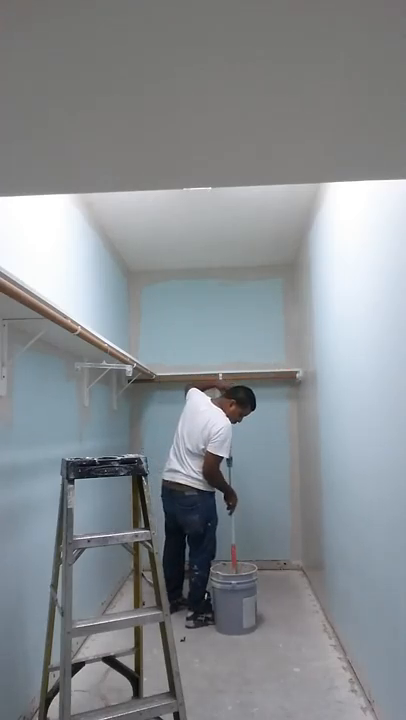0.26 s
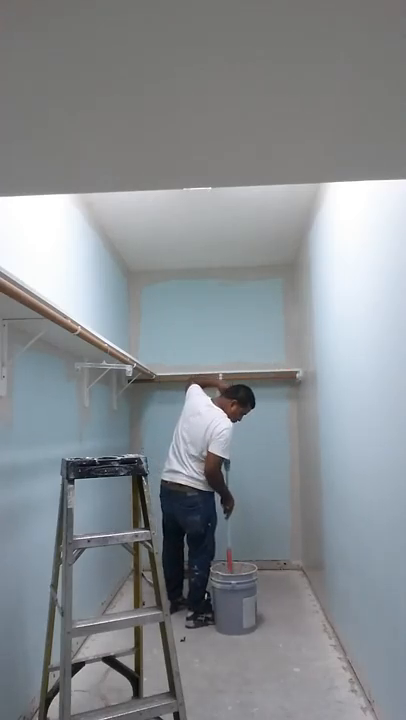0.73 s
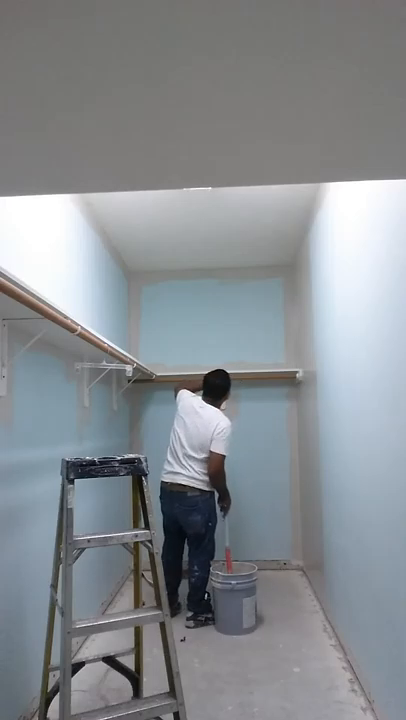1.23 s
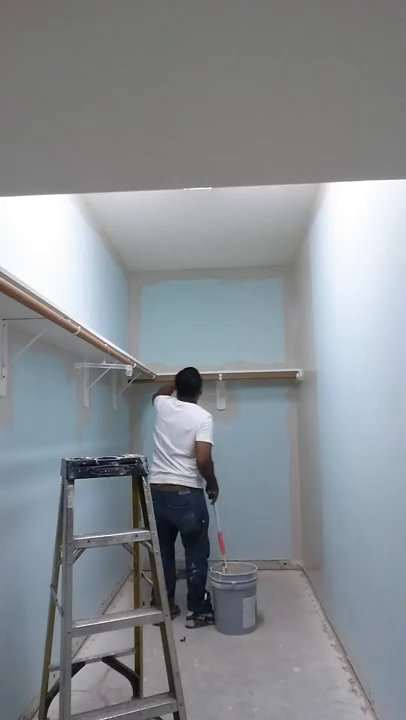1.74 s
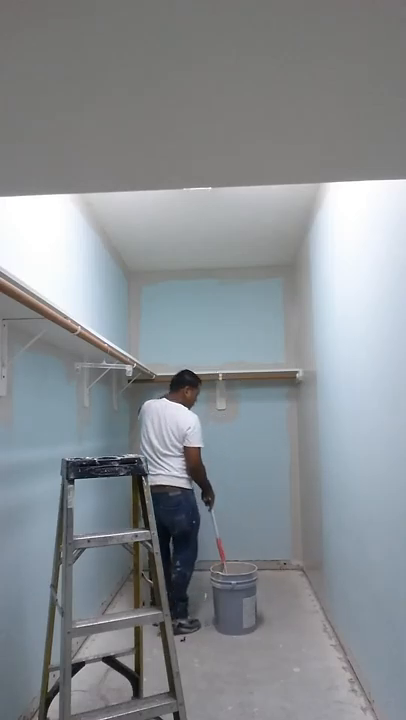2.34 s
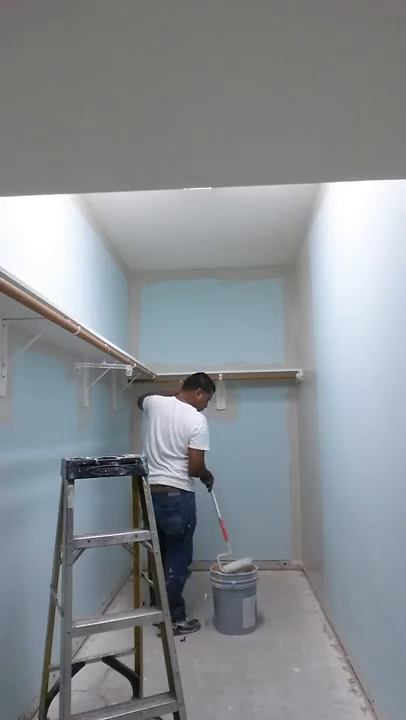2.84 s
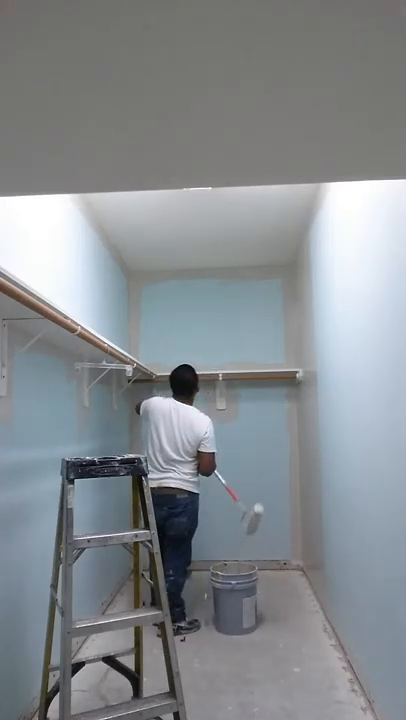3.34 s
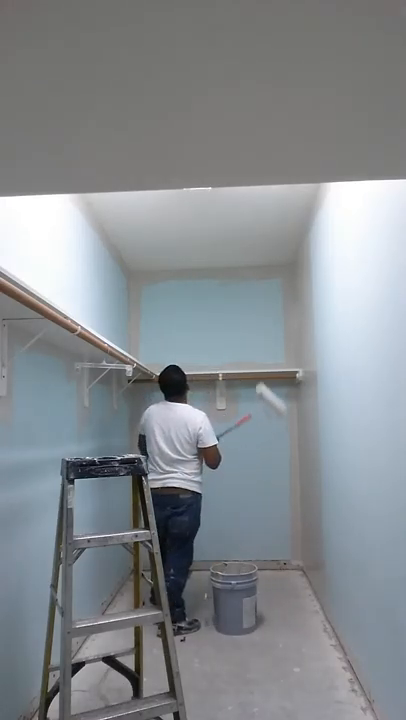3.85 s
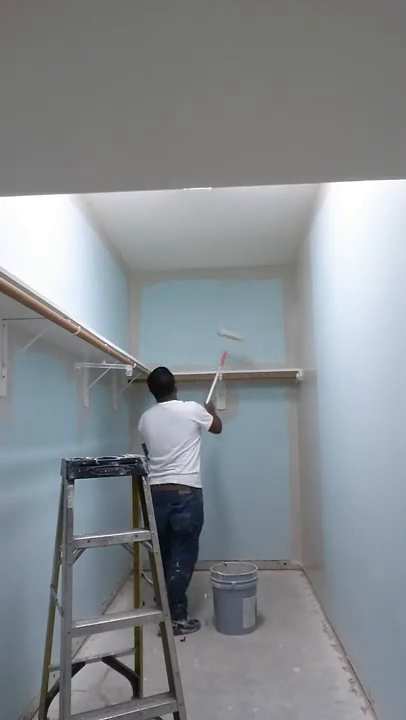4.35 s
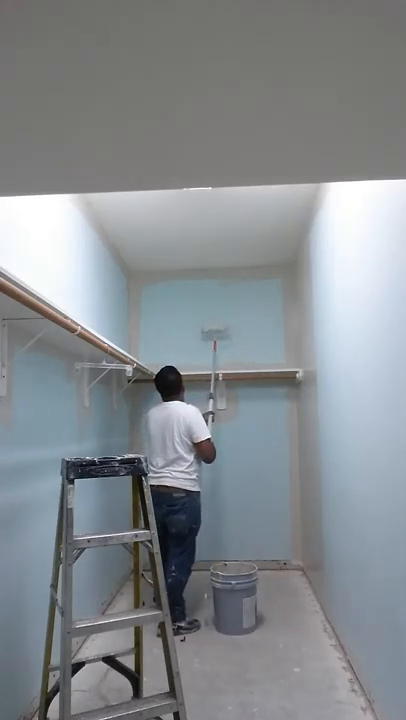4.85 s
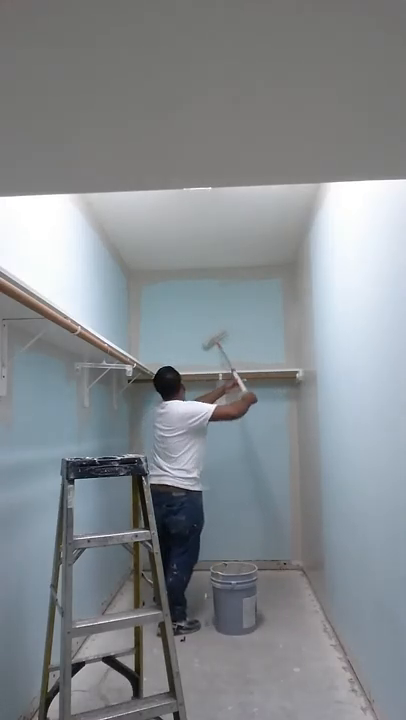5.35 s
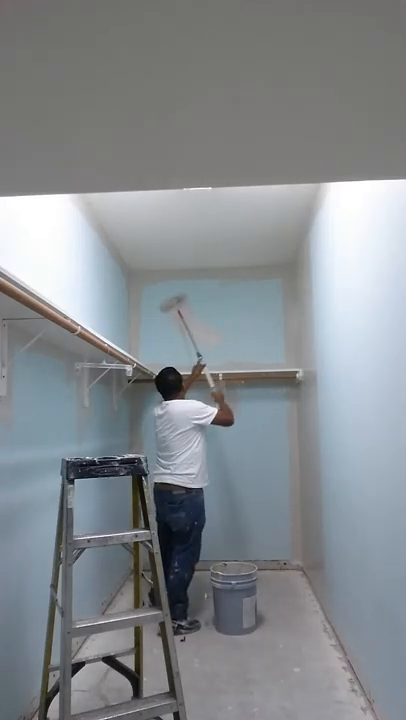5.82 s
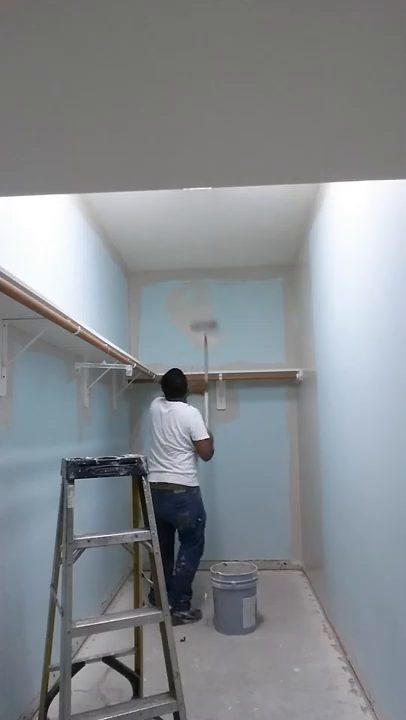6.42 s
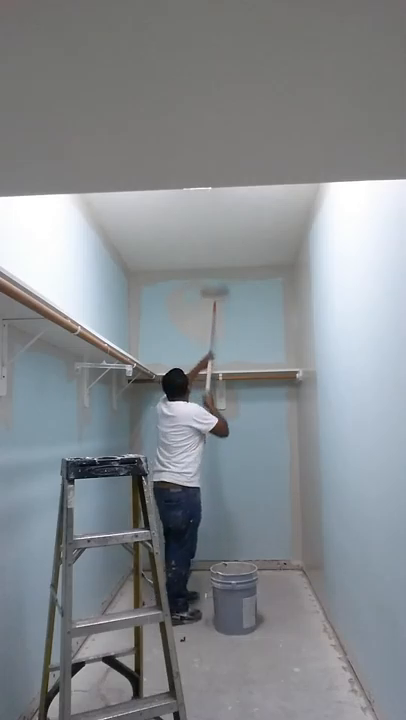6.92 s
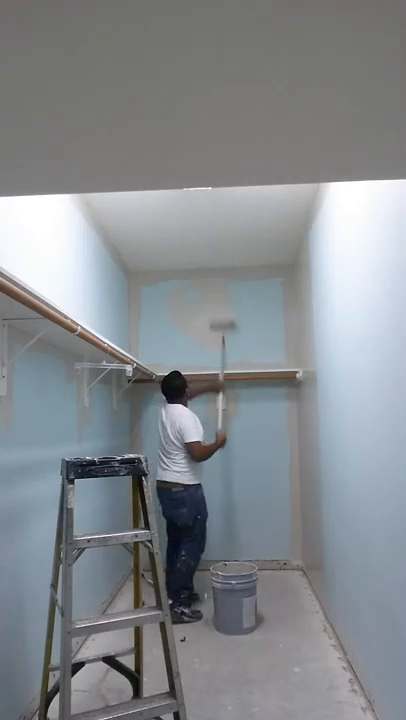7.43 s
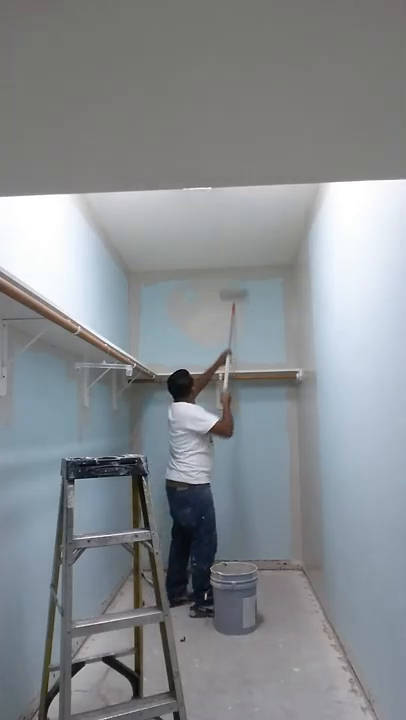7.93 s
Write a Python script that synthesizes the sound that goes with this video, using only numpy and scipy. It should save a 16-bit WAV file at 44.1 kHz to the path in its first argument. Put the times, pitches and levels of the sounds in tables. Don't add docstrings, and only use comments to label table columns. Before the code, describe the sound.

In a small, bare, very reverberant room, a wet paint roller drags and knocks in a plastic bucket, hollow and boomy, loudest around two seconds. A bright wet splat lifts it out near three seconds, followed by a last bump. From four seconds it rolls over a wall in soft sticky strokes, with one sharp ringing clack late on. Stereo microphones in the room, faint hiss.

```python
import sys
import numpy as np
from scipy import signal
from scipy.fft import rfft, irfft
from scipy.io import wavfile
from scipy.ndimage import uniform_filter1d

SR = 44100
rng = np.random.default_rng(int(sys.argv[2]) if len(sys.argv) > 2 else 0)


def wrap_up_sound(samples):
    columns = np.atleast_2d(samples).T
    tamed = np.clip(columns, -1, 1)
    steps = np.round(tamed * 32767).astype(np.int16)
    wavfile.write(sys.argv[1], SR, steps)


def how_loud(loudness_db):
    steps = np.asarray(loudness_db, float) / 20
    return 10 ** steps


N = 360738
EDGES = 250 * 2 ** np.arange(0, 6.2, 1 / 3)
CENTRES = np.sqrt(EDGES[1:] * EDGES[:-1])
TAIL = np.arange(int(1.4 * SR)) / SR
LEFT_RIGHT = np.array([[1], [-1]])
BLOW_BOOST_DB = 32
TOUCH_CYCLES = 1.13

# frequency in Hz, level in dB, T60 in seconds.
ROOM_BOOM = [(118, 1.5, 0.39), (144.2, -1, 0.38), (164.7, 4, 0.25), (191, 0.5, 0.46), (205, 2, 0.36),
             (238.9, -1, 0.46), (290, -6.5, 0.48), (353.3, -16, 0.16), (373.3, -9.5, 0.53),
             (412.7, -7.5, 0.51)]
# frequency in Hz, level in dB, T60 in seconds.
DEEP_THUMP = [(64, -14, 0.23), (75, 8.5, 0.55), (91, -7.5, 0.21)]
# frequency in Hz, level in dB per Hz.
TACK_COLOUR = [(1120, -10), (1900, -2), (2230, -2), (2520, 4.5), (3090, -2), (4950, 1.5), (5360, 4),
               (8270, -11), (13500, -13), (15100, -28), (15800, -29)]
# frequency in Hz, level in dB per Hz.
DRAG_COLOUR = [(190, -12.5), (330, -5), (504, -2), (615, -8.5), (720, -2.5), (1190, -5), (1550, -4),
               (2400, -9), (3120, -21.5), (5280, -120)]
# frequency in Hz, left-right likeness from -1 to 1.
PORT_LIKENESS = [(130, 0.63), (400, 0.996), (640, 0.93), (1000, 0.11), (1600, 0.018), (15000, -0.058)]


def unit(x, power=np.mean):
    return x / np.sqrt(np.mean(power(x ** 2, axis=-1)) + 1e-20)


def at_hz(points, hz):
    table = np.array(points)
    return np.interp(np.log(hz), np.log(table[:, 0]), table[:, 1])


def two_ports(mid, side, alike):
    return np.sqrt(1 + alike) * mid + np.sqrt(1 - alike) * side * LEFT_RIGHT


def both_ports(ring):
    return unit(ring * how_loud(-3 / 2 * LEFT_RIGHT), np.sum)


def heard(x, response):
    return signal.fftconvolve(x[None], response, axes=1)[:, :N]


def place():
    # frequency in Hz, T60 in seconds.
    room_t60 = [(100, 1), (400, 0.73), (1100, 0.95), (3000, 0.72), (8000, 0.71), (15000, 0.39)]
    # frequency in Hz, left minus right in dB.
    port_balance = [(60, -3.0), (110, -0.5), (200, -5), (380, -2), (700, -5), (1290, -10), (2380, -1.5),
                    (4400, 2.5), (8120, 0), (15000, -16.5)]
    direct_db, echo_rise_s, right_lag = -11.5, 0.0033, 18
    white = rng.standard_normal((2, 2, len(TAIL)))
    pieces = []
    for k, hz in enumerate(CENTRES):
        alike = np.clip(at_hz(PORT_LIKENESS, hz), -1, 1)
        mid, side = white[k % 2]
        decay = how_loud(-60 * TAIL / at_hz(room_t60, hz)) * (1 - np.exp(-TAIL / echo_rise_s))
        echoes = unit(two_ports(mid, side, alike) * decay, np.sum)
        echoes[[0, 1], [0, right_lag]] += how_loud(direct_db)
        band = signal.butter(2, EDGES[k:k + 2], "band", fs=SR, output="sos")
        pieces.append(signal.sosfilt(band, echoes) * how_loud(at_hz(port_balance, hz) / 2 * LEFT_RIGHT))
    return np.array(pieces)


def coloured(pieces, spectrum):
    return unit(np.tensordot(how_loud(at_hz(spectrum, CENTRES)), pieces, 1), np.sum)


def moving(x, spots, spectrum, dwell=2600):
    where = np.repeat(rng.integers(0, len(spots), N // 1000), dwell)[:N]
    return sum(heard(x * (where == k), coloured(spot, spectrum)) for k, spot in enumerate(spots))


def modes(table, swell_s=0.0037):
    hz, db, t60 = np.transpose(table)[:, :, None]
    swell = 1 - np.exp(-TAIL / swell_s)
    return how_loud(db - 60 * TAIL / t60) * np.sin(2 * np.pi * hz * TAIL) * swell


def pumped_modes(boom, thump):
    return (heard(boom, both_ports(modes(ROOM_BOOM).sum(0)))
            + heard(thump, both_ports(modes(DEEP_THUMP).sum(0))))


def resonance(x, hz, width):
    r = np.exp(-np.pi * width / SR)
    top = np.array([1, 0, -1]) * (1 - r * r) / 2
    return signal.lfilter(top, [1, -2 * r * np.cos(2 * np.pi * hz / SR), r * r], x)


def grains(per_s, spread_db):
    sizes = how_loud(spread_db * np.minimum(rng.exponential(1, N), 5)) * rng.choice([-1, 1], N)
    return unit(sizes * (rng.random(N) < per_s / SR))


def movements(rows, rise, fall, thump_pivot_db, thump_slope):
    s, length, tack_db, drag_db, weight_db = np.transpose(rows)
    thump_db = thump_pivot_db + thump_slope * (weight_db - thump_pivot_db)
    t = np.arange(0, N + 64, 64) / SR
    done = (t - s[:, None]) / length[:, None]
    speed = np.clip(np.minimum(done / rise, (1 - done) / fall), 0, 1) ** 0.7
    levels = (tack_db, drag_db, weight_db, thump_db)
    return [np.interp(np.arange(N) / SR, t, how_loud(db) @ speed) for db in levels]


def stroke(gains, snaps_per_s, bumps_per_s=200):
    tack, drag, boom, thump = gains
    bumps = grains(bumps_per_s, spread_db=4.5)
    snaps = grains(snaps_per_s, spread_db=8.0)
    rasp = grains(snaps_per_s / 3, spread_db=7.0)
    return tack * snaps, drag * rasp, boom * bumps, thump * bumps


def blows(rows, cycles, thud_octaves=0.38, sharp=0.81):
    # frequency in Hz, level in dB, T60 in seconds.
    bucket_ring = [(482, 1, 0.21), (627, -3.5, 0.52), (758, 7, 0.94)]
    low, mid, high = np.zeros((2, N)), np.zeros(N), np.zeros(N)
    table = np.array(DEEP_THUMP + ROOM_BOOM + bucket_ring)
    t, rings = TAIL[:SR // 5], modes(table)
    for s, body_db, thud_db, thud_hz, tick_db in rows:
        i, contact_s = round(s * SR), cycles / thud_hz
        rattle = unit(rng.standard_normal(len(t)) * np.exp(-t / max(contact_s, 1e-4)), np.sum)
        first = min(sharp, .99) * (contact_s < 0.012)
        rattle = first * (t == 0) + np.sqrt(1 - first ** 2) * rattle
        mid[i:i + len(t)] += how_loud(body_db - 7.5 + BLOW_BOOST_DB) * rattle
        high[i:i + len(t)] += how_loud(tick_db + BLOW_BOOST_DB) * rattle
        octaves_off = np.log2(table[:, 0] / thud_hz)
        near_db = -9 * (octaves_off / thud_octaves) ** 2 + rng.normal(0, 1.2, len(table))
        push = both_ports(how_loud(near_db) @ rings)[:, :N - i]
        low[:, i:i + len(TAIL)] += how_loud(thud_db + BLOW_BOOST_DB) * push
    return high, mid, low


def quiet_room():
    # frequency in Hz, level in dB per Hz.
    air_colour = [(18, -37.5), (30, 6), (141, 4), (286, -2.5), (353, -18), (435, -15), (1530, -13),
                  (3540, -13.5), (5990, -8.5), (11200, -15), (15800, -6.5)]
    # frequency in Hz, level in dB rms.
    hum_lines = [(118.4, -64), (344.5, -71), (5862, -76.5)]
    hz = np.maximum(np.arange(N // 2 + 1) * SR / N, 20)
    mid, side = rfft(rng.standard_normal((2, N)))
    air = irfft(how_loud(at_hz(air_colour, hz)) * two_ports(mid, side, at_hz(PORT_LIKENESS, hz)), N)
    t = np.arange(N) / SR
    lines = sum(how_loud(db - 2.5) * np.sin(2 * np.pi * line_hz * t) for line_hz, db in hum_lines)
    return how_loud(-60.5) * unit(air) + lines


def steps():
    # start in seconds, thud level in dB.
    heels = [(.128, -38.5), (.825, -47), (1.21, -51), (1.42, -46), (1.6, -49), (6.5, -34), (6.622, -48),
             (7.589, -35), (7.862, -42.5), (7.98, -46)]
    return blows([(s, -90, db, 75, -90) for s, db in heels], TOUCH_CYCLES)[2]


def squeaks(spot):
    # start in seconds, length in seconds, pitch in Hz, level in dB.
    axle = [
        (1.107, 0.07, 6070, -46),
        (1.496, 0.07, 1520, -40),
        (3.186, 0.043, 6100, -51),
        (3.58, 0.092, 2520, -55),
        (4.403, 0.11, 6100, -45),
    ]
    out, t = np.zeros(N), np.arange(N) / SR
    noise = rng.standard_normal(N)
    for s, length, hz, db in axle:
        swell = np.sin(np.pi * np.clip((t - s) / length, 0, 1)) ** .5
        out += how_loud(db) * swell * unit(resonance(resonance(noise, hz, 150), hz, 150))
    return heard(out, unit(spot.sum(0), np.sum))


def clack(spot, ring_db=10):
    # start in seconds, body in dB, thud in dB, thud centre in Hz, tick in dB.
    hit = [(6.7815, -14.5, -28, 118, -2)]
    # frequency in Hz, level in dB per Hz.
    pole_colour = [(300, -25), (700, -43), (950, -4.5), (1670, -8), (2500, -8.5), (3300, -1), (4340, 0.5),
                   (6200, -1), (8500, -5), (12000, -7.5), (15800, -25)]
    # frequency in Hz, width in Hz, level in dB.
    rail = [(888, 35, 5.5), (888, 2.6, 11.5), (1605, 2.7, 4), (1690, 3.7, 2), (1690, 173, 3.5),
            (2590, 1100, -13), (4280, 140, -12), (5000, 330, -8), (6100, 45, 4), (6280, 145, -1.5),
            (7850, 47, -5), (12900, 140, -11)]
    crack = coloured(spot, pole_colour)
    ring = sum(how_loud(db) * resonance(crack, hz, width) for hz, width, db in rail)
    rung = unit(crack + how_loud(ring_db) * ring, np.sum)
    high, mid, low = blows(hit, cycles=0.067, sharp=0.97)
    return heard(high, rung) + heard(mid, coloured(spot, DRAG_COLOUR)) + low


def splat(spot):
    # start in seconds, level in dB, rise in seconds, fall in seconds.
    spray = [(2.95, -34, 0.059, 0.032)]
    # frequency in Hz, level in dB per Hz.
    wet_colour = [(1180, -42), (2000, -38), (2750, -4), (3890, -2), (6210, 1.5), (9240, -6.5), (14900, -12),
                  (15800, -16)]
    s, db, rise, fall = spray[0]
    t = np.maximum(np.arange(N) / SR - s, 0)
    shape = np.minimum(t / rise, 1) ** .5 * np.exp(-np.maximum(t - rise, 0) / fall)
    return heard(how_loud(db) * shape * grains(4000, spread_db=4.5), coloured(spot, wet_colour))


def load_in_bucket(spots):
    # start in seconds, length in seconds, paint tack in dB,
    # plastic scrape in dB, weight on the bucket in dB.
    plunges = [(0.0, 0.22, -53, -34.5, -56), (.1, 0.23, -52, -40, -32.5), (.36, 0.17, -49, -40.5, -41),
               (.44, 0.28, -51.5, -43, -53), (.74, 0.3, -44.5, -44.5, -47), (1.0, 0.34, -45.5, -48, -50.5),
               (1.24, 0.18, -39, -39.5, -54), (1.44, 0.28, -44, -47, -46), (1.66, .22, -44, -41, -40.5),
               (1.88, 0.16, -40.5, -47, -41), (1.96, 0.17, -40, -24, -23.5),
               (2.16, 0.34, -45, -32.5, -35.5), (2.33, 0.23, -39.5, -44, -45), (2.53, 0.2, -43, -37, -37),
               (2.82, 0.093, -45.5, -42, -38), (2.93, 0.2, -40, -70, -63), (3.14, 0.21, -72, -62.5, -68),
               (3.43, 0.156, -53, -32, -26.5), (3.62, 0.14, -57, -74, -51)]
    # start in seconds, body in dB, thud in dB, thud centre in Hz, tick in dB.
    bucket_hits = [(0.0, -17, -35.5, 226, -37), (.132, -16.5, -30, 176, -48),
                   (.226, -10.5, -23.5, 309, -71), (.227, -54, -23.5, 520, -72), (.443, -22, -37, 270, -50),
                   (.505, -16, -28, 188, -44), (1.021, -43, -42.5, 100, -40), (1.77, -47.5, -43, 290, -58),
                   (1.962, -28, -28, 190, -45), (1.971, -3, -22.5, 304, -29), (1.973, -37, -16, 556, -72),
                   (2.069, -8, -23, 202, -41), (2.178, -7.5, -21, 223, -40), (2.349, -19, -30, 200, -41),
                   (2.527, -25.5, -28, 258, -58), (2.619, -36, -28, 205, -47),
                   (2.827, -19.5, -28, 180, -42), (2.894, -30.5, -33, 284, -55),
                   (2.97, -36, -36.5, 270, -62), (3.396, -27, -35, 210, -42),
                   (3.409, -39, -19.5, 142, -64.5), (3.414, -20, -26, 334, -62),
                   (3.455, -28, -18.5, 118, -58)]
    # frequency in Hz, level in dB per Hz.
    plastic_colour = [(200, -4), (300, -4), (420, -5), (600, -4), (800, -2), (1200, -5.5), (2000, -14),
                      (2800, -21.5), (3600, -52), (6000, -67)]
    gains = movements(plunges, rise=0.15, fall=0.44, thump_pivot_db=-64.5, thump_slope=0.49)
    tack, scrape, boom, thump = stroke(gains, snaps_per_s=1500)
    tick, body, thud = blows(bucket_hits, cycles=0.23)
    treble = moving(tack + tick, spots, TACK_COLOUR)
    plastic = moving(scrape + body, spots, plastic_colour)
    return treble + plastic + pumped_modes(boom, thump) + thud


def roll_on_wall(spots):
    # start in seconds, length in seconds, paint tack in dB, nap drag in dB,
    # lean on the wall in dB.
    strokes = [(4.06, 0.14, -47.5, -46, -66), (4.3, 0.2, -44, -50.5, -63), (4.5, 0.18, -48, -49.5, -55),
               (4.66, 0.2, -43, -52.5, -58.5), (4.9, 0.23, -59, -67, -73), (5.1, 0.37, -73.5, -69.5, -79.5),
               (5.41, 0.19, -49, -48, -55), (5.52, .44, -45.5, -47, -51.5), (5.95, 0.35, -58.5, -59, -55),
               (6.28, 0.17, -40, -52, -49), (6.41, 0.26, -36.5, -37, -44), (6.58, 0.22, -40.5, -60, -56),
               (6.8, .25, -58, -43.5, -46.5), (7.18, 0.29, -42.5, -52.5, -57),
               (7.4, 0.32, -35.5, -44.5, -46), (7.7, 0.19, -45.5, -49.5, -60),
               (7.83, 0.57, -36.5, -43, -48.5)]
    # start in seconds, body in dB, thud in dB, thud centre in Hz, tick in dB.
    landings = [(4.072, -33, -55, 173, -41), (4.321, -39, -57.5, 113, -39), (4.929, -50, -59, 118, -50.5),
                (5.407, -48, -55.5, 67, -51), (7.864, -35, -42, 170, -36)]
    # start in seconds, body in dB, thud in dB, thud centre in Hz, tick in dB.
    dry_taps = [(1.295, -29.5, -49, 118, -44), (1.527, -34, -45, 196, -38.5),
                (3.423, -32, -18.5, 125, -30.5)]
    gains = movements(strokes, rise=0.21, fall=0.31, thump_pivot_db=-43.5, thump_slope=1.87)
    tack, drag, boom, thump = stroke(gains, snaps_per_s=2500)
    tap_tick, tap_body, tap_thud = blows(dry_taps, cycles=0.3)
    tick, body, thud = blows(landings, TOUCH_CYCLES)
    treble = moving(tack + tap_tick + tick, spots, TACK_COLOUR)
    nap = moving(drag + tap_body + body, spots, DRAG_COLOUR)
    return treble + nap + pumped_modes(boom, thump) + tap_thud + thud


def scene():
    spots = [place() for _ in range(3)]
    background = quiet_room() + steps()
    details = squeaks(spots[2]) + clack(spots[0]) + splat(spots[1])
    return background + details + load_in_bucket(spots) + roll_on_wall(spots)


def roll_off(x):
    return signal.sosfilt(signal.butter(12, 16250, fs=SR, output="sos"), x)


def record(dry):
    limit_db, squeeze = -14.5, 0.68
    attack_s, release_db_per_s = 0.00051, 153
    dry = signal.sosfilt(signal.butter(2, 31, "high", fs=SR, output="sos"), dry)
    power = uniform_filter1d(np.mean(dry ** 2, 0), size=441, origin=220)
    level_db = 10 * np.log10(power + 1e-12)
    fall = release_db_per_s * np.arange(N) / SR
    held_db = np.maximum.accumulate(level_db + fall) - fall
    lag = np.exp(-1 / (attack_s * SR))
    cut_db = signal.lfilter([1 - lag], [1, -lag], squeeze * np.maximum(held_db - limit_db, 0))
    clipped = np.clip(dry * how_loud(-cut_db), -.8, .8)
    kept = signal.sosfilt(signal.cheby2(18, 80, 15950, fs=SR, output="sos"), clipped)
    return roll_off(kept)


dry = scene()
out = record(dry)
wrap_up_sound(out)
```